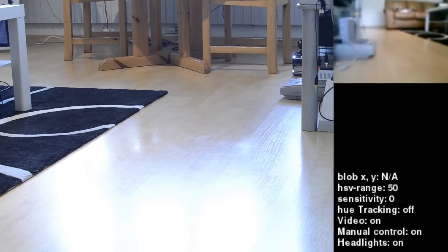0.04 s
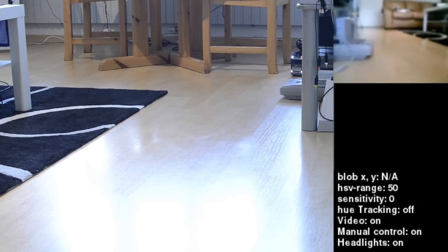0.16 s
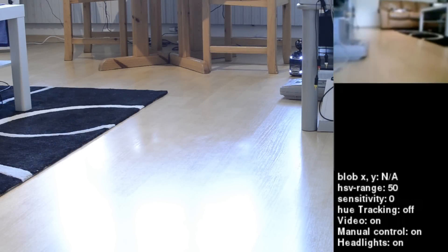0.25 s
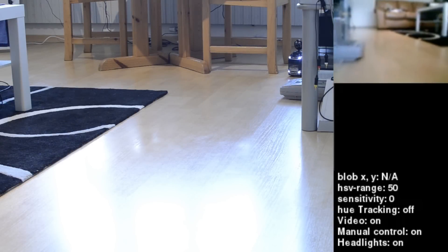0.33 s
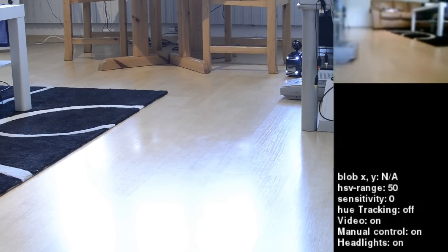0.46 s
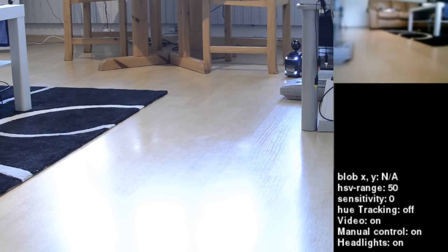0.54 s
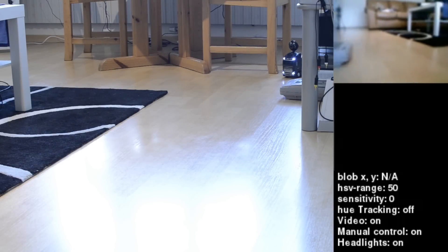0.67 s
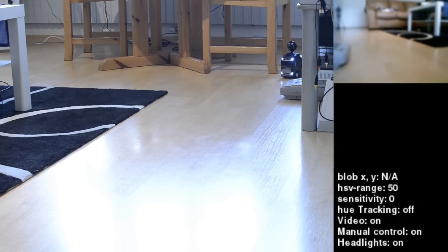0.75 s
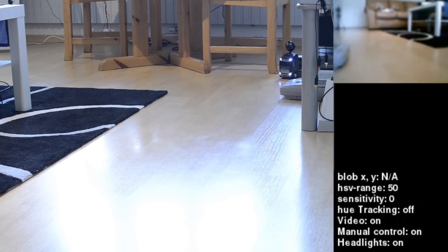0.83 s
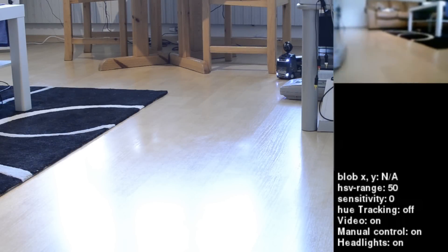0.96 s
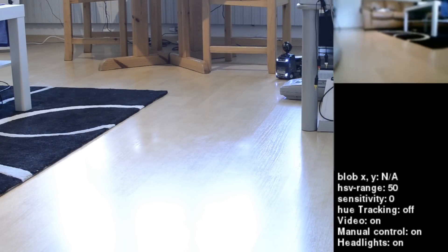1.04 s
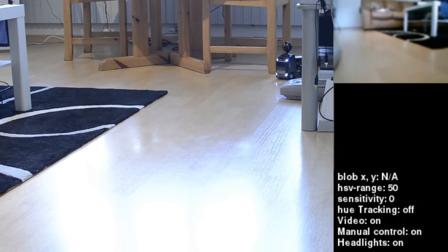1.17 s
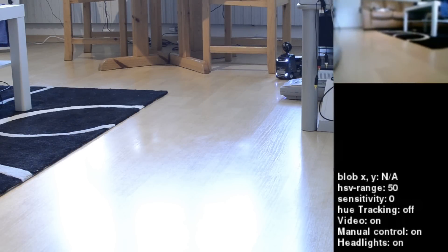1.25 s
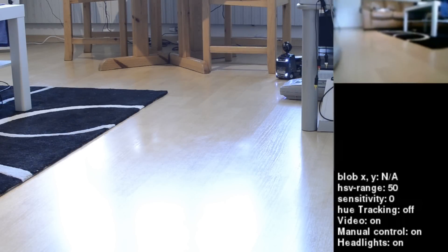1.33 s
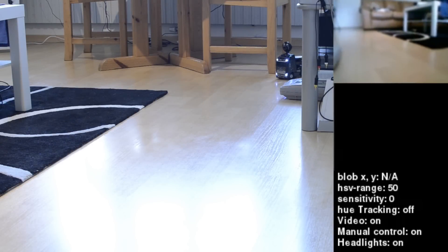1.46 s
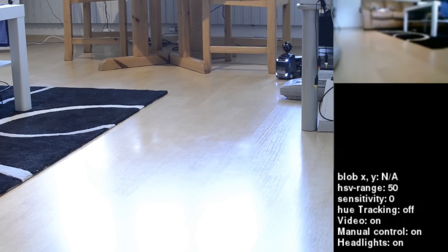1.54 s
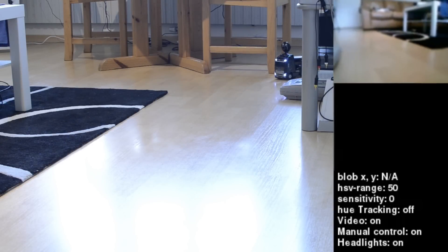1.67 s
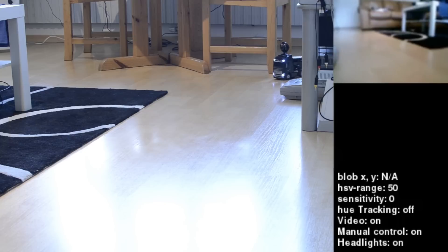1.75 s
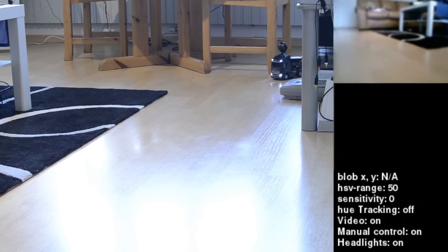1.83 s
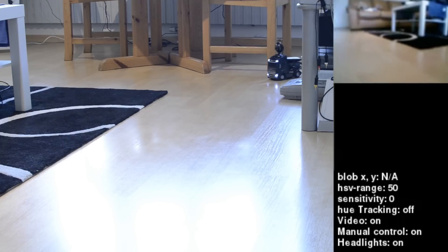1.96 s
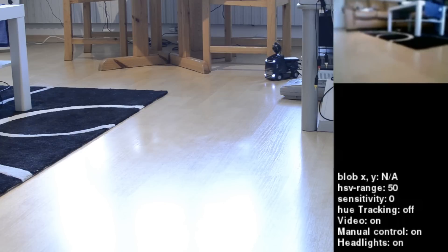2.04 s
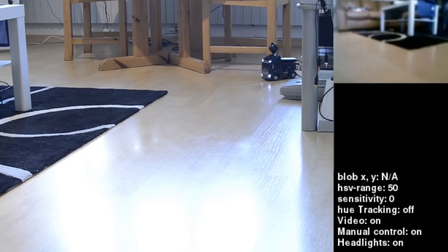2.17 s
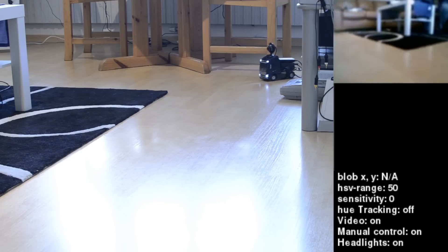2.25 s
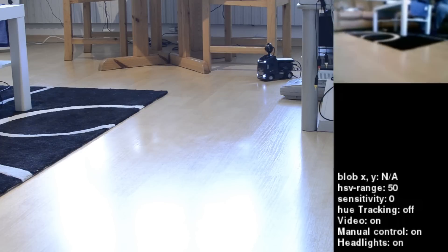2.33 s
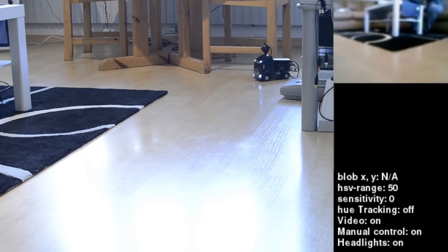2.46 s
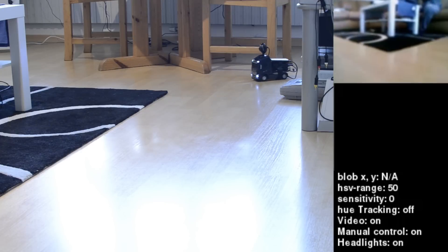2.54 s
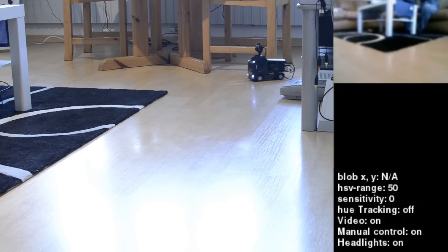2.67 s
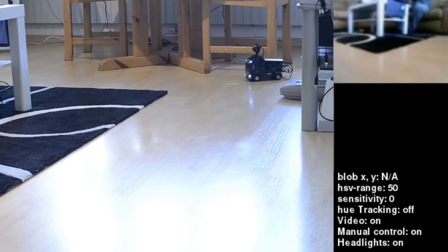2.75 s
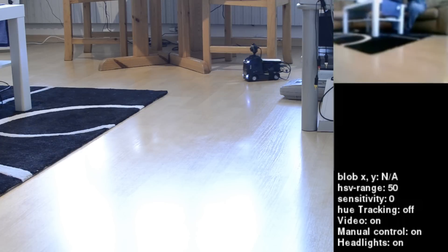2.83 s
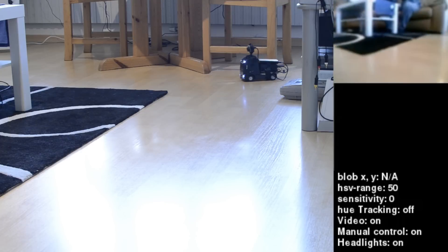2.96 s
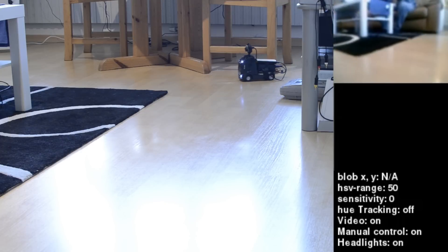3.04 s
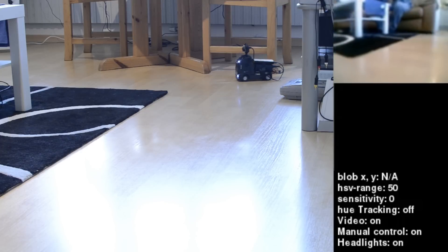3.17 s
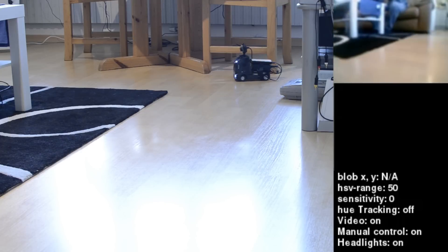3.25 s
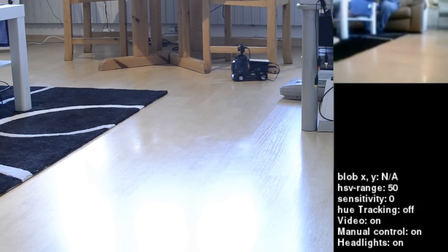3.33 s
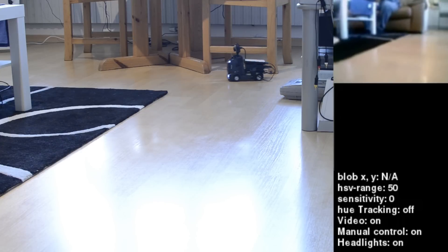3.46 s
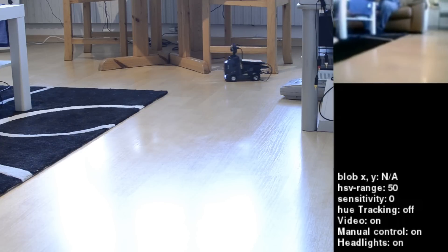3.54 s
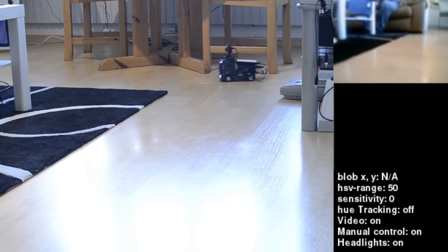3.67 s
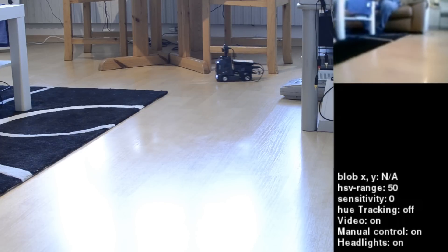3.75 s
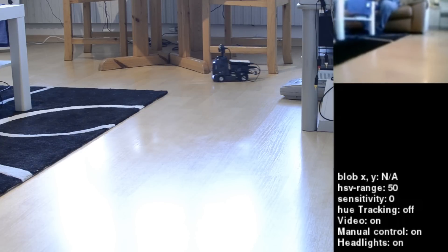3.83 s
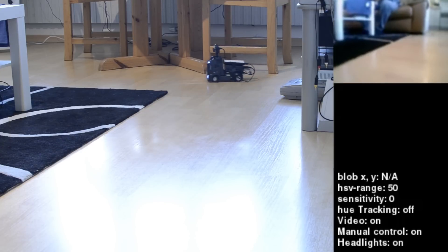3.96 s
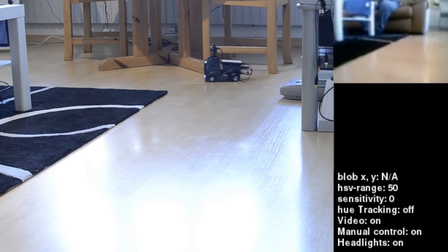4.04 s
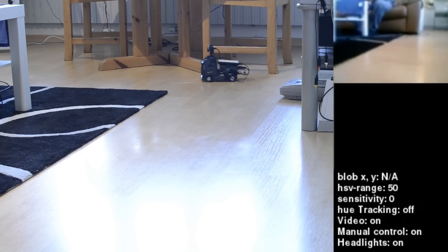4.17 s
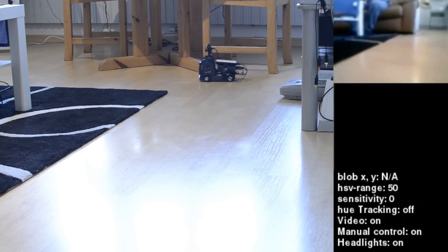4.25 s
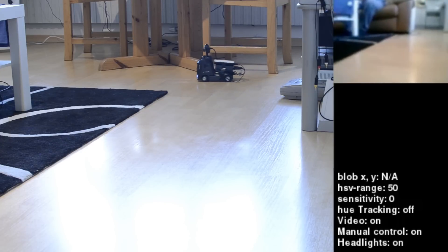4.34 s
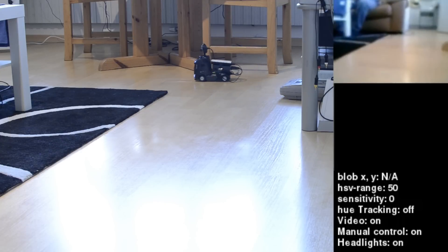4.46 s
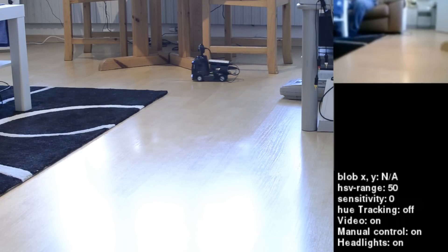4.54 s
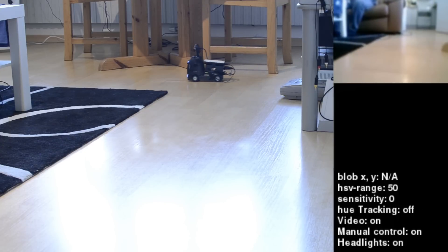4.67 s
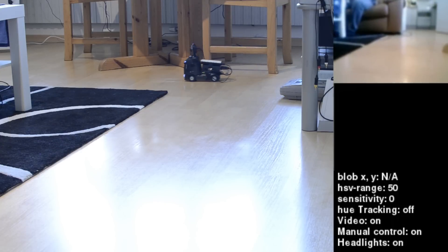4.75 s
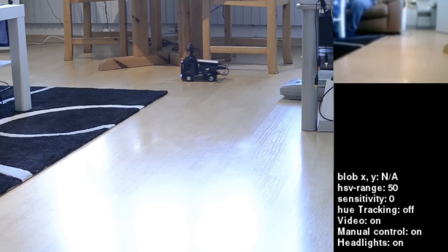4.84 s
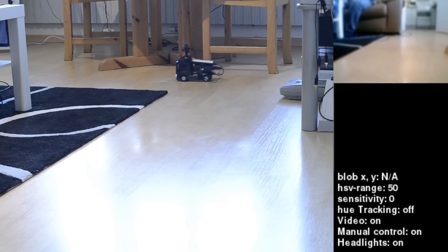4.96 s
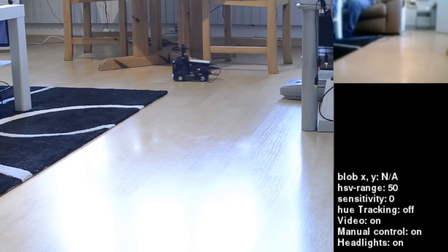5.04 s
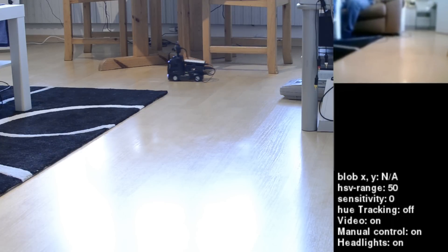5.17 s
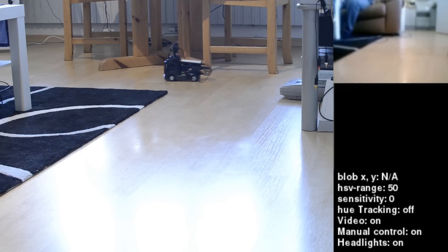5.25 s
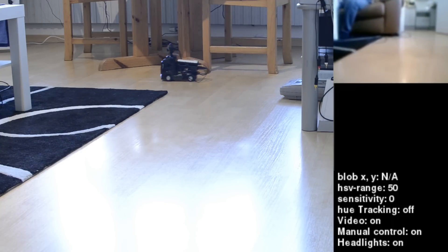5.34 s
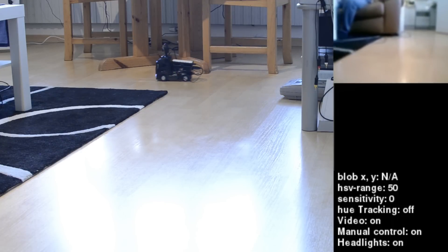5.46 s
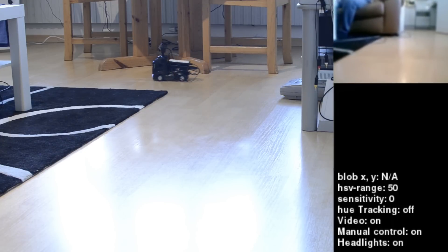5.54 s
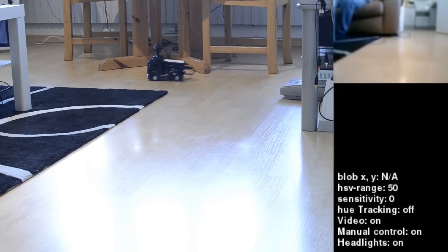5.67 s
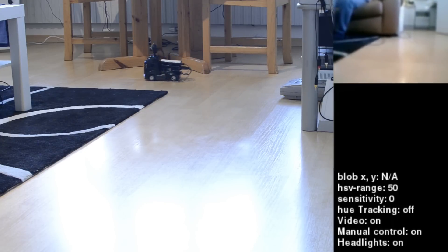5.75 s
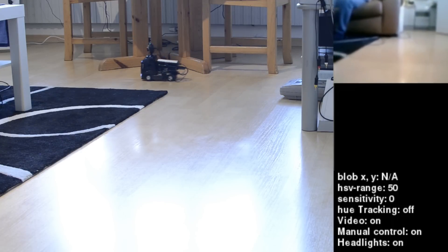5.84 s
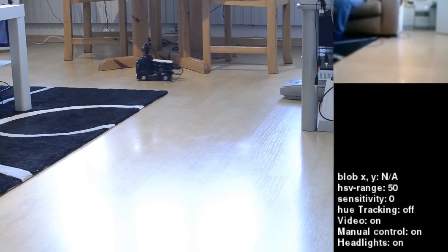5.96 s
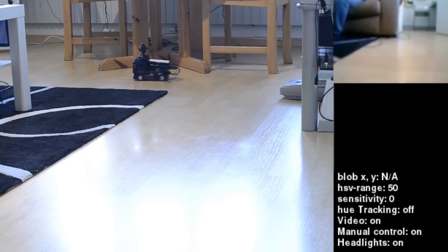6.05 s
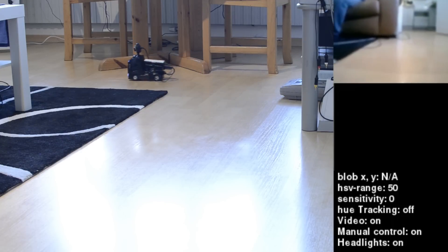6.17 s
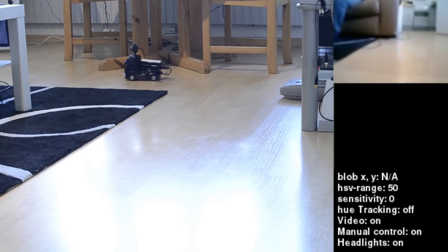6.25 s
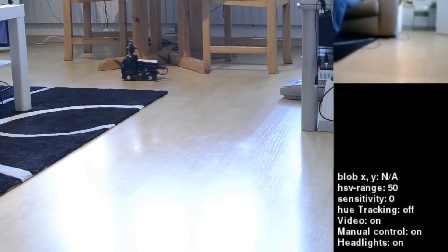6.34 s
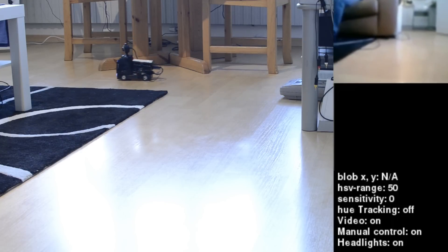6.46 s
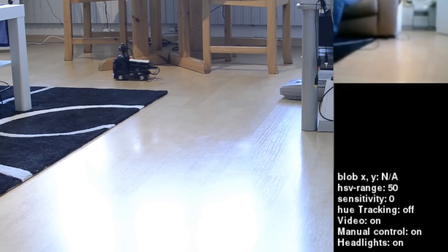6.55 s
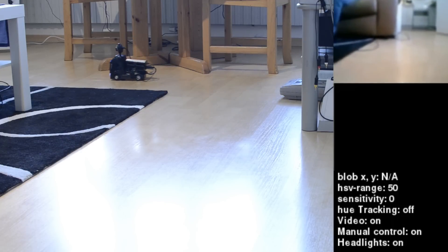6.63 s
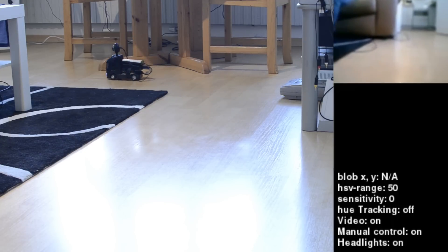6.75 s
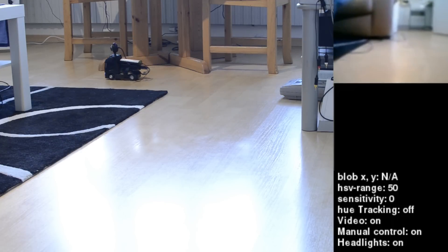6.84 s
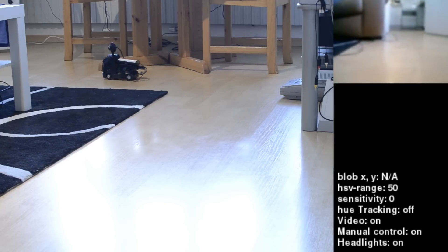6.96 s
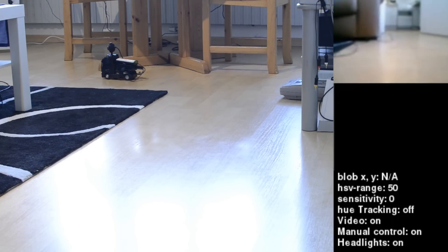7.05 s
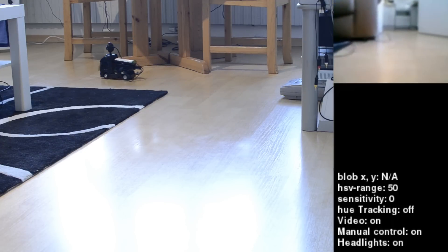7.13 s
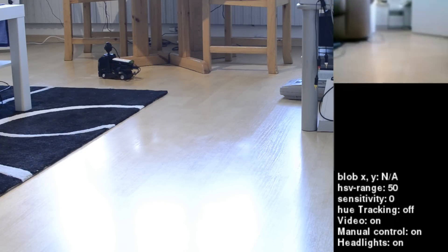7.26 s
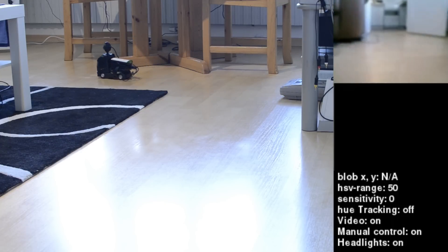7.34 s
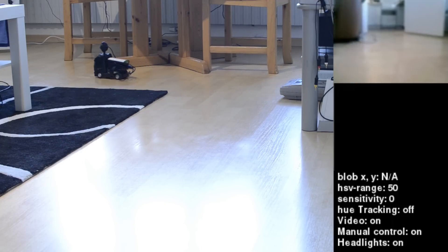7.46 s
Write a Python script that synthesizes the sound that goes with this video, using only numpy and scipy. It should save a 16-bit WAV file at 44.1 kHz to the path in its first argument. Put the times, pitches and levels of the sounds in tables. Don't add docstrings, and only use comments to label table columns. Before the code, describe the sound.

A small toy truck with two electric gear motors drives over a hard wooden floor a few metres from the microphone. It grinds round a bend, whines clearly on a short straight, and halts just after one second. Gears creak and click, then it pulls off into a long rattling bend with knocks and plastic ticks. Higher whining straights alternate with rougher bends. The living room is reverberant, with faint household noise, and the sound is almost mono.

```python
import sys
import numpy as np
from scipy import signal
from scipy.fft import rfft, irfft
from scipy.io import wavfile
from scipy.ndimage import uniform_filter1d

SR = 44100
rng = np.random.default_rng(int(sys.argv[2]) if len(sys.argv) > 2 else 0)


def wav_record(signal):
    frames = np.transpose(np.atleast_2d(signal))
    bounded = np.clip(frames, -1, 1)
    quanta = np.round(bounded * 32767).astype(np.int16)
    wavfile.write(sys.argv[1], SR, quanta)


def convert_level_to_amplitude(level_db):
    exponent = np.asarray(level_db, float) / 20
    return 10 ** exponent


N = 330750
T = np.arange(N) / SR


def level(x, db=0):
    return x * convert_level_to_amplitude(db) / np.sqrt(np.mean(x ** 2))


def curve(points):
    return np.interp(T, *np.transpose(points))


def colour(x, points):
    hz, db = np.transpose(points)
    f = np.fft.rfftfreq(len(x), 1 / SR) + 1
    gain_db = np.interp(np.log(f), np.log(hz), db, left=-90, right=-90)
    return irfft(rfft(x) * convert_level_to_amplitude(gain_db), len(x))


def resonance(x, hz, width_hz):
    return signal.lfilter(*signal.iirpeak(hz, hz / width_hz, SR), x)


def steep(x, hz, width_hz):
    return resonance(resonance(x, hz, width_hz), hz, width_hz)


def boost(x, peaks):
    return x + sum((convert_level_to_amplitude(db) - 1) * resonance(x, hz, width_hz) for hz, width_hz, db in peaks)


def noise():
    return rng.standard_normal(N)


def walk(rate_hz):
    hold = int(SR / rate_hz)
    steps = np.repeat(rng.standard_normal(N // hold + 1), hold)
    return 1.3 * uniform_filter1d(uniform_filter1d(steps, hold), hold)[:N]


def strikes(rows, decay_s, rough=0.95):
    out = np.zeros(N)
    t = np.arange(SR // 4) / SR
    for (s, db), d in zip(rows, np.broadcast_to(decay_s, len(rows))):
        i = int(s * SR)
        push = convert_level_to_amplitude(db) * np.exp(-t / max(d, .0002))
        out[i:i + len(t)] += push[:N - i]
    return out * (1 - rough + rough * noise())


def room(x, count=5):
    t60_s, treble_t60_s, wet_db = 0.67, 0.76, 2.5
    t = np.arange(SR) / SR
    before = SR // 2
    x = np.r_[x[before:0:-1], x]
    wet, place = 0, np.linspace(0, count - 1, len(x))
    for k in range(count):
        share = np.cos(np.pi / 2 * np.clip(place - k, -1, 1))
        echoes = rng.standard_normal(SR) * (t > .004)
        lows = signal.lfilter(*signal.butter(1, 2500, fs=SR), echoes)
        tail = lows * 1000 ** (-t / t60_s) + (echoes - lows) * 1000 ** (-t / treble_t60_s)
        tail /= np.sqrt(np.sum(tail ** 2))
        wet = wet + signal.fftconvolve(x * share, tail)[:len(x)]
    return (x + convert_level_to_amplitude(wet_db) * wet)[before:]


# (frequency [Hz], density [dB per Hz])
QUIET_COLOUR = [(12, -51), (20, -8.5), (109, -8.5), (281, -3), (372, -3), (478, -6), (631, 0.5),
                (788, -14.5), (906, 0), (1500, -11.5), (1920, -2), (2270, -17), (3260, -12.5), (7110, -25),
                (15500, -37.5)]
# (frequency [Hz], rms [dB])
HUM = [(49, -92), (123, -75), (181, -71.5)]


def quiet():
    hum = sum(level(resonance(noise(), hz, 5.9), db) for hz, db in HUM)
    return level(colour(noise(), QUIET_COLOUR), -55.5) * convert_level_to_amplitude(.4 * walk(3)) + hum


# (frequency [Hz], density [dB per Hz])
HISS_COLOUR = [(12, -57), (20, -20), (421, -6.5), (733, -11), (914, -13.5), (4820, -15.5), (5690, -18),
               (8620, -15.5), (13400, -21), (15000, -32)]


def hiss():
    return level(colour(noise(), HISS_COLOUR), -76)


# (time [s], peak [dB], decay [s])
THUDS = [
    (4.12, -64, 0.034),
    (4.40, -63, 0.027),
    (6.05, -61, 0.098),
]


def far_thuds():
    s, db, decay_s = np.transpose(THUDS)
    return convert_level_to_amplitude(28) * steep(strikes(np.c_[s, db], decay_s), 43, 60)


# (time [s], peak [dB], decay [s])
CREAKS = [
    (1.175, -58, 0.054),
    (1.235, -55, 0.026),
    (1.345, -59.5, 0.04),
    (1.374, -64, 0.054),
    (1.462, -53.5, 0.081),
    (1.54, -70, 0.033),
    (1.621, -58, .03),
]
# (frequency [Hz], level [dB])
CREAK_COLOUR = [(300, -1), (600, 7.5), (1000, 1), (1500, -5.5), (2000, -8), (2500, -9), (3400, -5),
                (5500, -13.5)]


def creaks():
    s, db, decay_s = np.transpose(CREAKS)
    return level(colour(noise(), CREAK_COLOUR)) * strikes(np.c_[s, db], decay_s, rough=0)


# (time [s], peak [dB], burst [s])
TICKS = [(0.3694, -82, 0.0043), (2.2588, -67, 0.004), (2.7203, -64, 0.004), (2.8806, -54, 0.0042),
         (2.887, -60, 0.004), (2.8924, -59, 0.004), (2.912, -66, 0.004), (2.934, -70, 0.004),
         (3.3592, -63, 0.0041), (4.0094, -61, 0.004), (4.1874, -61, 0.0046), (4.4992, -58, 0.0039),
         (5.222, -63.5, 0.0037), (5.3227, -59.5, 0.0033), (6.6897, -70, 0.0033), (7.3425, -58, 0.003),
         (7.379, -67, 0.0044)]


def ticks():
    s, db, burst_s = np.transpose(TICKS)
    rows = np.c_[s, db]
    tick = convert_level_to_amplitude(10.5) * steep(steep(strikes(rows, burst_s), 6400, 5900), 6200, 7000)
    snap = convert_level_to_amplitude(5) * steep(strikes(rows, 0.0016), 8000, 5000)
    return tick, snap


# (time [s], peak [dB], knock at the drone [dB], crack [dB])
KNOCKS = [(0.284, -57, 14, -9), (0.365, -44, 8.5, -16), (1.177, -63, 1, -27), (1.782, -50, 8, 4),
          (1.844, -47.5, 6, 17), (1.925, -46, 3.5, 2), (1.993, -48.5, 2, 5), (2.119, -48.5, 1, 28),
          (2.339, -48, -15, 22), (2.419, -54, -4, 10), (2.572, -53, -11, 10), (2.65, -50, -15, -7),
          (2.715, -55, -13, 10), (2.785, -47, 0.5, 13), (2.878, -46.5, 6.5, 27), (3.008, -45.5, 0, 0),
          (3.216, -51, -4, 17), (3.286, -56, -1, -6), (4.004, -48.5, 4, 23.5), (4.213, -50, 9, 5),
          (6.687, -44.5, 2.5, 0), (7.074, -50, 5, 9), (7.216, -53, 8, 14)]
# (time [s], peak [dB], knock at the drone [dB], crack [dB])
RESTART = [
    (1.467, -51, -8, 15),
    (1.49, -51, 4.5, 8),
    (1.621, -57, 0, 16),
]


def knocks():
    s, db, drone_db, crack_db = np.transpose(KNOCKS + RESTART)
    thump = convert_level_to_amplitude(9) * steep(strikes(np.c_[s, db], 0.00065, rough=0), 298, 260)
    ring = convert_level_to_amplitude(23) * steep(strikes(np.c_[s, db + drone_db], 0.00044, rough=0), 566.5, 59)
    burst = strikes(np.c_[s, db + crack_db], 0.0041)
    crack = convert_level_to_amplitude(-5) * steep(steep(burst, 1460, 4100), 1500, 3900)
    return thump + ring, crack


# (time [s], peak [dB], tone [Hz])
GEAR_TONES = [(.06, -47, 973), (.135, -45.5, 1030), (.776, -42.5, 935), (.871, -40, 962), (0.926, -39, 1002),
              (.955, -42, 999), (1.021, -44.5, 1065), (1.06, -46, 1000), (1.75, -44.5, 2520),
              (1.79, -44, 2000), (1.8, -48, 2540), (1.917, -49, 890), (1.980, -43, 883), (2.056, -37.5, 886),
              (2.113, -40.5, 890), (2.188, -46, 895), (2.265, -43, 885), (2.332, -46, 878), (2.416, -53, 899),
              (2.505, -46, 900), (2.63, -53, 860), (2.706, -45, 864), (2.78, -41, 883), (2.82, -47, 848),
              (2.869, -43, 857), (2.942, -45, 849), (3.08, -45, 853), (3.187, -46, 868), (3.56, -37, 1956),
              (3.63, -42, 2000), (3.685, -45, 1008), (3.765, -43, 2109), (4.04, -35.5, 2115),
              (4.05, -40.5, 3127), (4.21, -48, 850), (4.25, -48, 1025), (4.279, -45, 1148), (4.29, -44.5, 880),
              (4.315, -43, 1240), (4.36, -41.5, 847), (4.435, -45, 862), (4.48, -46, 855), (4.645, -41, 950),
              (4.74, -37, 1957), (4.79, -36, 2000), (4.847, -40, 1996), (4.85, -38.5, 970),
              (4.895, -39.5, 1013), (5.32, -33.5, 2140), (5.43, -34, 2118), (6.275, -38.5, 2198),
              (6.33, -33, 2186), (6.39, -44, 2190), (6.42, -38, 2032), (6.445, -37.5, 2127), (6.48, -41, 2058),
              (6.55, -45, 2158), (6.98, -42, 1123), (7.046, -42, 1137), (7.072, -54, 861), (7.14, -46, 1136),
              (7.218, -47, 855), (7.285, -45.5, 870), (7.321, -46, 876), (7.47, -46.5, 872),
              (7.343, -44, 1141)]


def gear_tones():
    out = np.zeros(N)
    t = np.arange(-SR // 16, SR // 16) / SR
    for s, db, hz in GEAR_TONES:
        i = int(s * SR) - SR // 16
        swell = np.exp(-.5 * (t * hz / 10.3) ** 2)
        tone = convert_level_to_amplitude(db) * swell * np.sin(2 * np.pi * hz * t)
        out[max(i, 0):i + len(t)] += tone[max(-i, 0):N - i]
    return out


def by_bend(pair, bend):
    return pair[0] + (pair[1] - pair[0]) * np.clip(bend, 0, 1)


# (time [s], grind [dB], tightness of bend [0-1])
GRIND = [(0, -56.5, 0.8), (.3, -53, 1), (.6, -53, 0.83), (.8, -59, 0), (1.02, -49, 1), (1.13, -93, 0.95),
         (1.62, -85, 1), (1.645, -55.5, 1), (1.9, -52, 0.76), (3.33, -51, 0.8), (3.42, -56, 0.13),
         (3.99, -54.5, 0), (4.06, -49.5, 0.94), (4.56, -51, 0.96), (4.65, -55, 0.06), (6.66, -56, 0.12),
         (6.71, -50, 0.79), (7.5, -54.5, 0.84)]
# (frequency [Hz], level [dB])
GRIND_COLOUR = [(400, -12.5), (700, -11), (1000, 2.5), (1400, -3), (2000, 3.5), (2600, -4), (3200, -5.5),
                (4500, -14.5)]
# (frequency [Hz], level [dB])
RATTLE_COLOUR = [(1410, -23), (2400, 1), (2600, -4), (2990, -4.5), (3630, -5), (4140, -4), (5730, -11),
                 (6360, -12), (9400, -32), (14000, -52)]
# (frequency [Hz], level [dB])
SCRUB_COLOUR = [(53, -52), (90, -21), (124, -1.5), (151, -7), (172, -32), (225, 12), (500, 0.5), (650, -36),
                (1100, -120)]
# (time [s], lift [dB])
BOARDS = [(0, 8), (.6, 1.5), (1.7, 4.5), (3.3, -2), (3.4, -11), (4.05, -8), (4.2, -6), (4.6, -10),
          (5.1, 3.5), (5.3, 5), (6.2, 5), (6.35, -1), (6.7, -0.5), (7.5, -0.5)]
# (straight [dB], full bend [dB])
RATTLE_DB = (7.5, -2)
# (straight [dB], full bend [dB])
SCRUB_DB = (-14.5, -9.5)
# (straight [dB], full bend [dB])
SHAFT_DB = (3, 0.5)


def grinding(turn):
    s, grind_db, bend = np.transpose(GRIND)
    grind_db, bend = np.interp(T, s, grind_db), np.interp(T, s, bend)
    throb = np.sin(2 * np.pi * turn)
    slip = np.exp(-turn / 0.066) * convert_level_to_amplitude(2.5 * walk(9.4))

    grind = level(colour(noise() * convert_level_to_amplitude(2.7 * walk(200)), GRIND_COLOUR), 4.72)
    grind = grind * convert_level_to_amplitude(4.07 * throb + walk(16))

    rattle = level(colour(noise() * convert_level_to_amplitude(3 * walk(900)), RATTLE_COLOUR), -2.02)
    rattle = rattle * convert_level_to_amplitude(by_bend(RATTLE_DB, bend) + 3.8 * throb + 0.99 * walk(12))

    shaft = level(steep(noise(), 567.8, 37), -14) * convert_level_to_amplitude(by_bend(SHAFT_DB, bend) + curve(BOARDS))
    drone = level(steep(noise(), 636, 160), -8.5) * convert_level_to_amplitude(by_bend((-13, 3.5), bend))
    drone = (shaft + drone) * convert_level_to_amplitude(0.84 * walk(18))

    scrub = level(colour(noise() * (0.24 + slip), SCRUB_COLOUR), -5.5) * convert_level_to_amplitude(by_bend(SCRUB_DB, bend))
    return convert_level_to_amplitude(grind_db) * (grind + rattle + drone), convert_level_to_amplitude(grind_db) * scrub


# (time [s], speed lost [0-1], whine swell [dB])
SEAMS = [
    (1.63, 0.02, -8),
    (2.0, 0.01, 1),
    (2.751, 0.04, 2),
    (3.658, 0.01, 7.5),
    (4.3, 0, 3),
    (4.63, 0.01, -0.5),
    (5.38, 0.02, 3),
    (5.92, 0.03, 4),
    (6.451, 0.02, 2.5),
]


def seams():
    s, lost, swell_db = np.transpose(SEAMS)
    width_s = .07
    shape = np.exp(-.5 * ((T[:, None] - s) / width_s) ** 2)
    return 1 - shape @ lost, shape @ swell_db


# (time [s], share of wobble and wander)
PLAY = [(0, .9), (.62, .9), (.7, .7), (1.0, .65), (1.7, .9), (3.4, .9), (3.48, .8), (3.72, .85), (3.85, 1),
        (4.55, 1), (4.63, .6), (4.93, .7), (5.05, 1.05), (6.68, 1.05), (6.74, .7), (6.95, .75), (7.1, .9),
        (7.5, .9)]


def gears(hz, lines, strain):
    teeth_per_wobble, pinion_teeth = 63, 8
    turn = np.cumsum(hz) / SR / teeth_per_wobble + rng.random()
    wobble = .05 * (np.sin(2 * np.pi * turn) + 0.42 * np.sin(4 * np.pi * turn + 1))
    wander = (.015 + .022 * strain) * (walk(30) + walk(120))
    speed = 1 + curve(PLAY) * (wobble + wander)
    phase = 2 * np.pi * np.cumsum(hz * speed) / SR
    pinion = 1 + .4 * np.sin(phase / pinion_teeth + 0.67 * walk(40))
    whine = 0
    for k, db in lines:
        line = convert_level_to_amplitude(db + 3.5 * walk(150)) * np.sqrt(2) * np.sin(k * phase)
        whine = whine + (line * pinion if k == 1 else line)
    return whine, turn % 1


def columns(spans, level_index):
    rows = np.concatenate(spans).T
    running = sum((T >= s[0][0]) & (T <= s[-1][0]) for s in spans) > 0
    fade_db = -60 * (1 - uniform_filter1d(1. * running, 200))
    return [np.interp(T, rows[0], c) + fade_db * (k in level_index) for k, c in enumerate(rows[1:])]


# (time [s], tooth rate [Hz], first line [dB], second line re first [dB])
OUTER = [
    [(0, 945.5, -58.5, 2), (.64, 960, -56, 7), (.7, 974.4, -44, -3), (.85, 992.4, -42.5, -0.5),
     (.96, 1008, -46.5, -10), (.99, 980, -57, -4), (1.1, 920, -83, -4)],
    [(1.619, 989.5, -51.5, 4), (1.9, 869.6, -51, 4.5), (2.45, 914.3, -52, 8), (2.8, 869, -49.5, 2.5),
     (3.3, 842.7, -52.5, 6.5), (3.43, 879.5, -51.5, 2), (3.47, 985, -48, 7), (3.9, 1101, -48.5, -2),
     (4.05, 1084, -48, 0), (4.12, 1122, -50.5, -20), (4.4, 1119, -52, -17), (4.6, 955.3, -56, -6),
     (4.69, 980, -46, -15), (4.72, 1000, -40, -6), (5.05, 1077, -45.5, 2), (6.25, 1100, -49, -2),
     (6.7, 1104, -46.5, -11), (6.8, 1112, -50.5, -10), (7.5, 1126, -48.5, 3)],
]
# (time [s], tooth rate [Hz], level [dB], second line lift [dB])
INNER = [
    [(0, 578.5, -47, 2), (.55, 602.7, -50, -3), (.63, 800, -56, 13), (.69, 950, -43.5, -4),
     (.95, 992, -45.5, 0.5), (.99, 979, -65, -3), (1.1, 750, -83, 0)],
    [(1.61, 541, -46, 3), (1.9, 607, -53, -5), (3.42, 699.5, -65, 2), (3.47, 960, -49.5, 8),
     (3.75, 1044, -51.5, -1), (4.05, 1089, -44, 1), (4.12, 815, -48, 0.5), (4.58, 868.7, -57, 8.5),
     (4.64, 955.4, -40.5, -8), (4.7, 975.5, -39, -6), (4.73, 989.6, -39, 0.5), (5.1, 1040, -44.5, -0.5),
     (6.25, 1061, -43.5, 2), (6.68, 1064, -45.5, 3), (6.74, 986, -45.5, 7), (6.93, 879, -49, 6.5),
     (7.15, 818, -46.5, 2), (7.5, 825.7, -52.5, 1)],
]
# (multiple, level [dB])
INNER_ORDERS = [(1, -2.5), (2, -0.5), (3, -13.5), (4, -12.5)]
# (multiple, level re first line [dB])
UPPER_ORDERS = [(3, -8), (4, -14.5), (5, -14.5)]


def motors():
    outer_hz, first_db, sharp_db = columns(OUTER, (1,))
    inner_hz, inner_db, lift_db = columns(INNER, (1,))
    slowed, swell_db = seams()
    outer_hz, inner_hz = outer_hz * slowed, inner_hz * slowed
    first_db, inner_db = first_db + swell_db, inner_db + swell_db
    strain = np.clip((1 - inner_hz / outer_hz - .06) / .25, 0, 1)

    outer_lines = [(1, first_db), (2, first_db + sharp_db)]
    outer_lines += [(k, first_db + db) for k, db in UPPER_ORDERS]
    outer, turn = gears(outer_hz, outer_lines, 0.1512 * strain)
    outer = boost(outer, [(872, 53, 2.2)])

    inner_lines = [(k, inner_db + db + lift_db * (k == 2)) for k, db in INNER_ORDERS]
    inner, _ = gears(inner_hz, inner_lines, 1.597 * strain)
    return convert_level_to_amplitude(-7.5) * outer + convert_level_to_amplitude(-8) * inner, turn


# (frequency [Hz], width [Hz], lift [dB])
GEARBOX = [(1000, 500, 0), (2000, 46, 3.5), (2520, 80, 9), (2725, 310, 8.5), (3270, 650, -10),
           (4060, 290, 5)]
# (frequency [Hz], width [Hz], lift [dB])
BODY = [(505, 110, 4.5), (719, 21, 7), (783, 32, -4.5), (863, 100, 4.5), (980, 33, 0), (1150, 48, 1),
        (1596, 163, 4.5), (1965, 73, 0), (2164, 84, 1.5), (2660, 22, 0), (3770, 80, -1), (4230, 94, -1)]


def scene():
    whine, turn = motors()
    grind, scrub = grinding(turn)
    truck = boost(boost(whine, GEARBOX) + grind, BODY)
    thump, crack = knocks()
    tick, snap = ticks()
    rings = gear_tones() + creaks()
    hits = crack + tick + convert_level_to_amplitude(4) * thump
    echoed = room(convert_level_to_amplitude(-1.5) * truck + hits + convert_level_to_amplitude(-5) * scrub + convert_level_to_amplitude(-7) * rings)
    mid = echoed + scrub + far_thuds() + thump + snap + rings + quiet()
    side = hiss() + convert_level_to_amplitude(-68) * np.roll(mid, 9)
    return mid + side * np.array([[1], [-1]])


def low_pass(x):
    return signal.sosfilt(signal.butter(12, 15640, fs=SR, output="sos"), x)


# (frequency [Hz], width [Hz], depth [0-1])
NOTCHES = [(5705, 385, 1), (6940, 210, 0.9)]


def record(dry):
    for hz, width_hz, depth in NOTCHES:
        dry = dry - depth * resonance(dry, hz, width_hz)
    return low_pass(dry)


dry = scene()
out = record(dry)
wav_record(out)
```